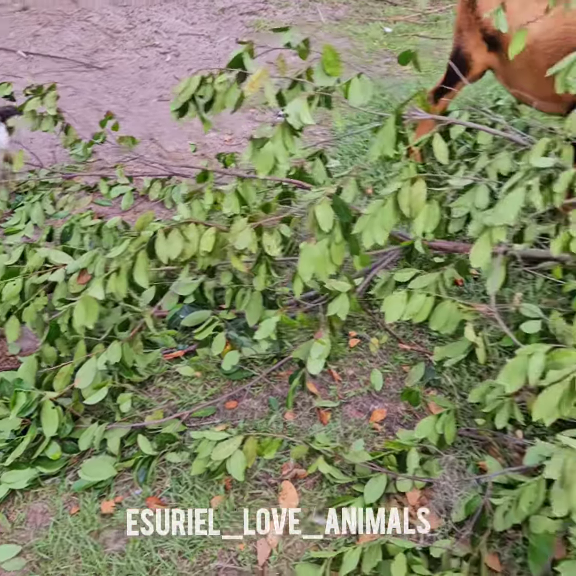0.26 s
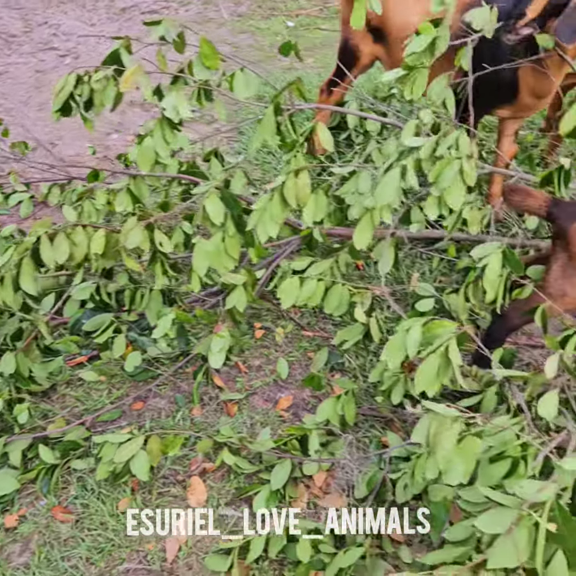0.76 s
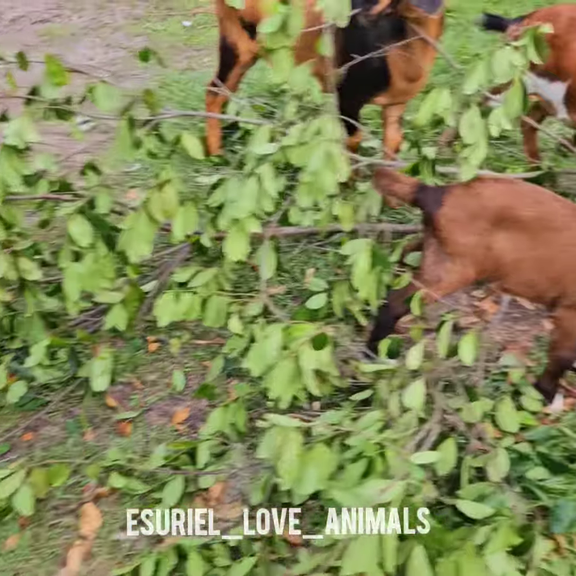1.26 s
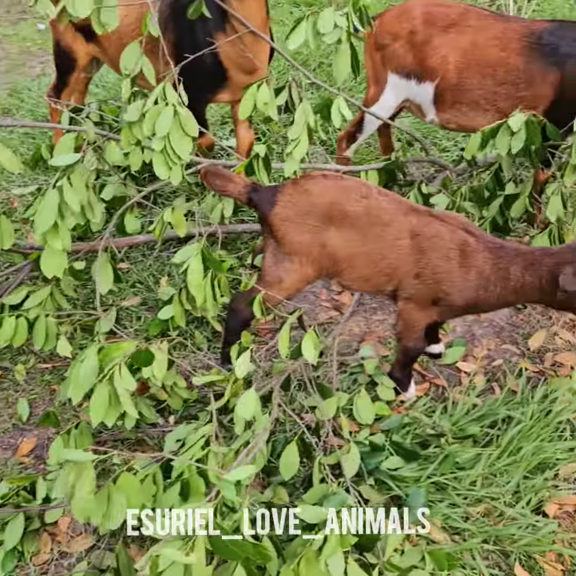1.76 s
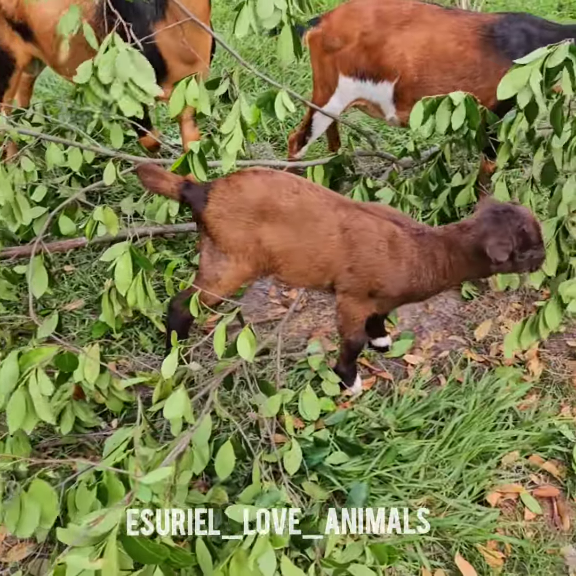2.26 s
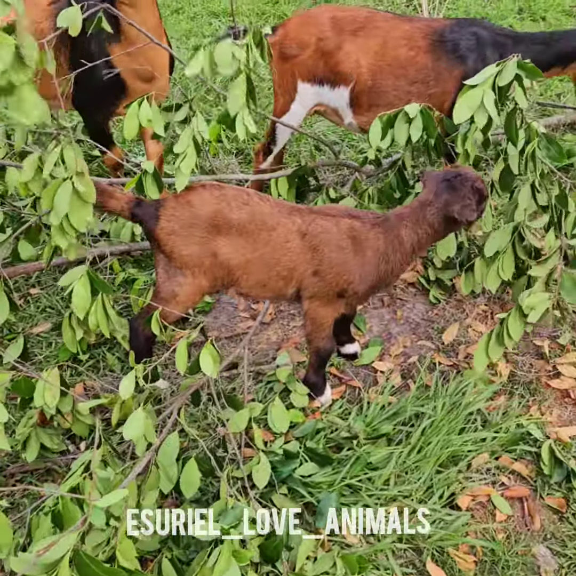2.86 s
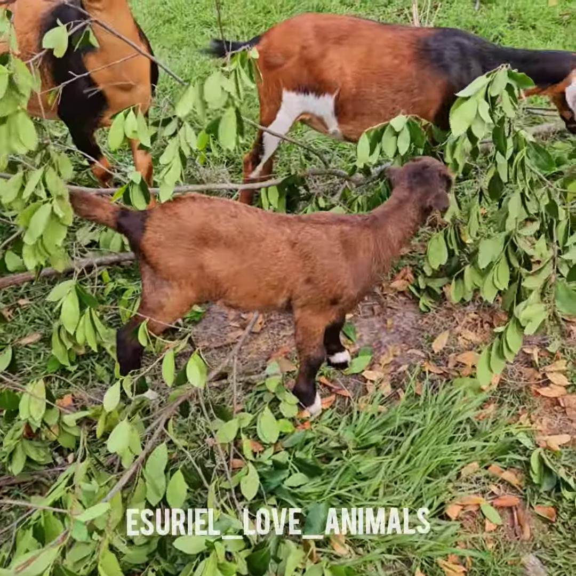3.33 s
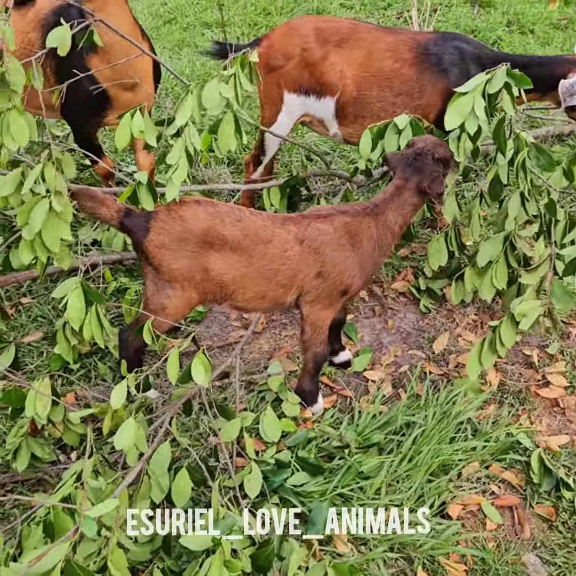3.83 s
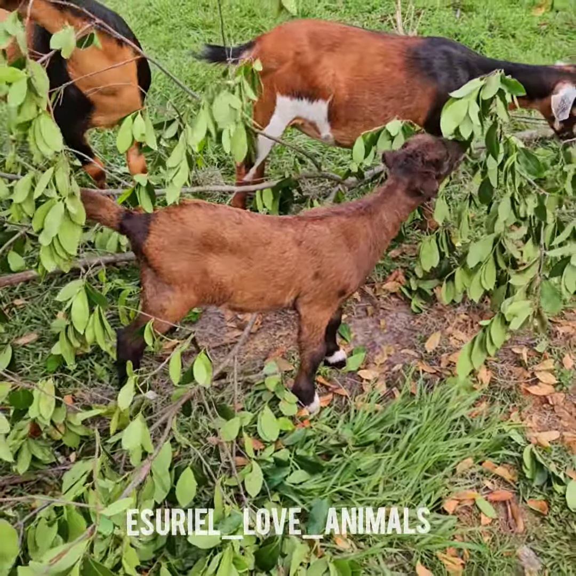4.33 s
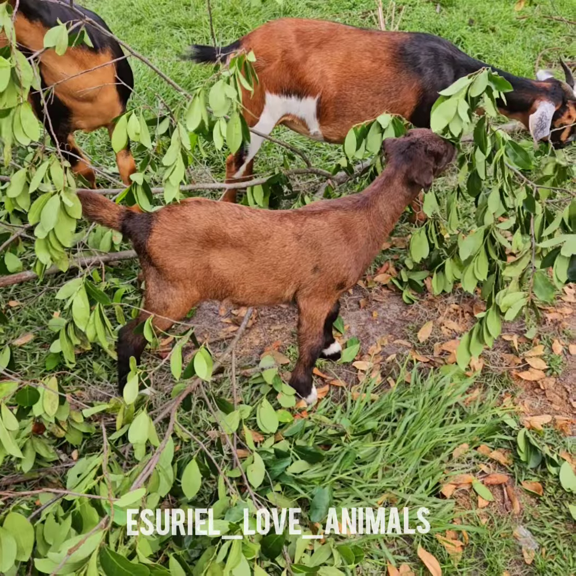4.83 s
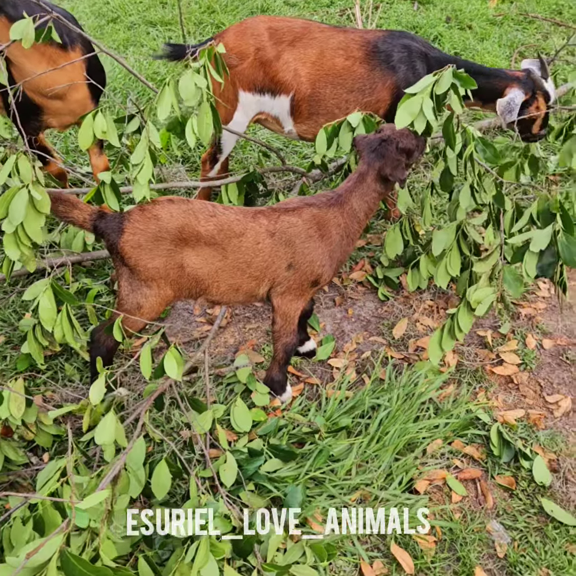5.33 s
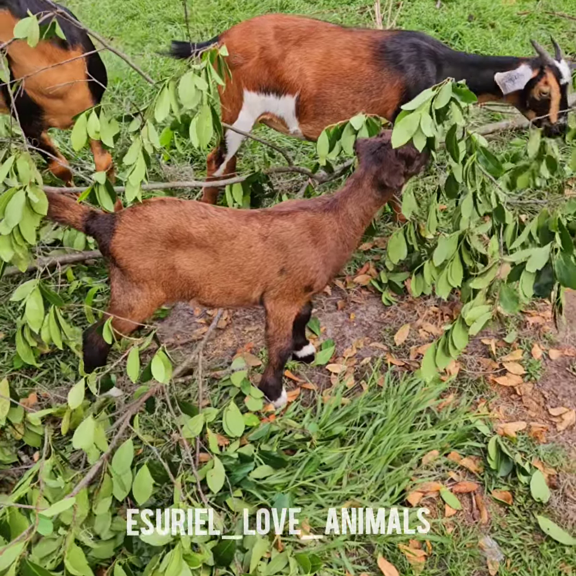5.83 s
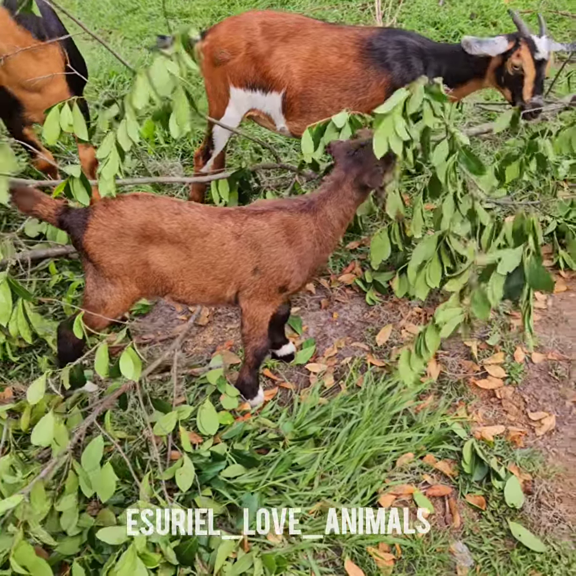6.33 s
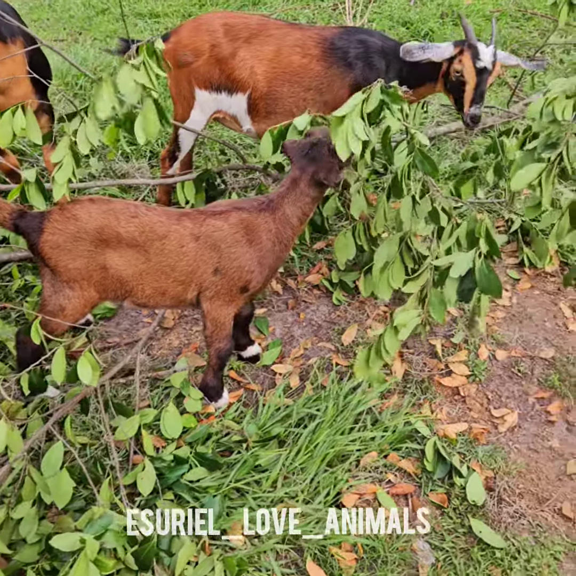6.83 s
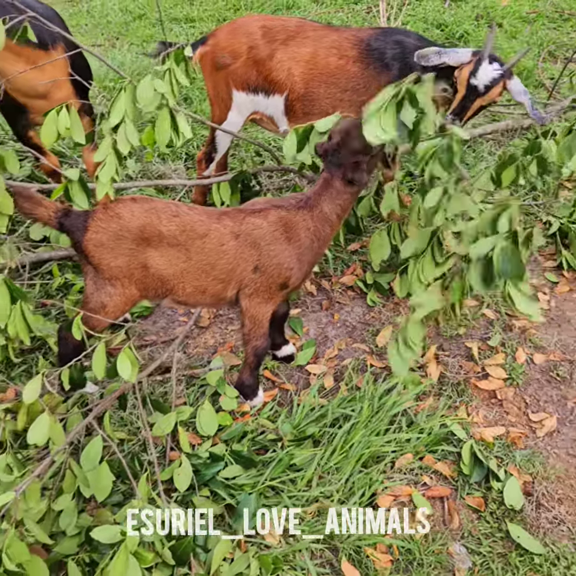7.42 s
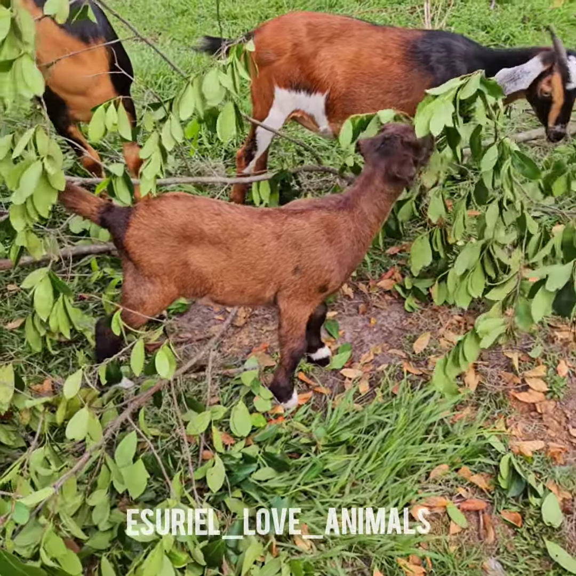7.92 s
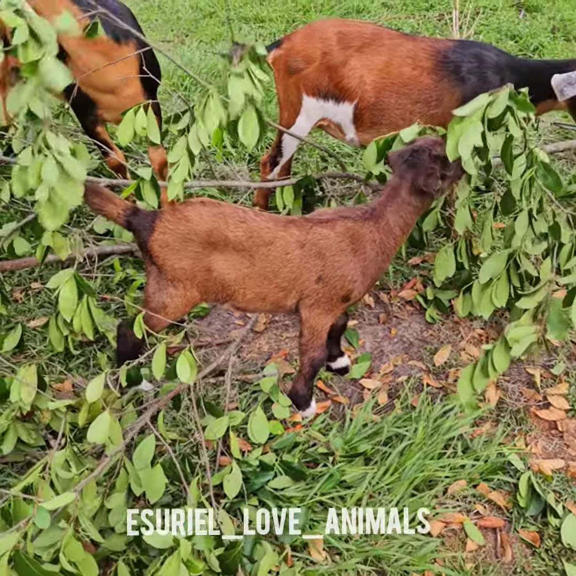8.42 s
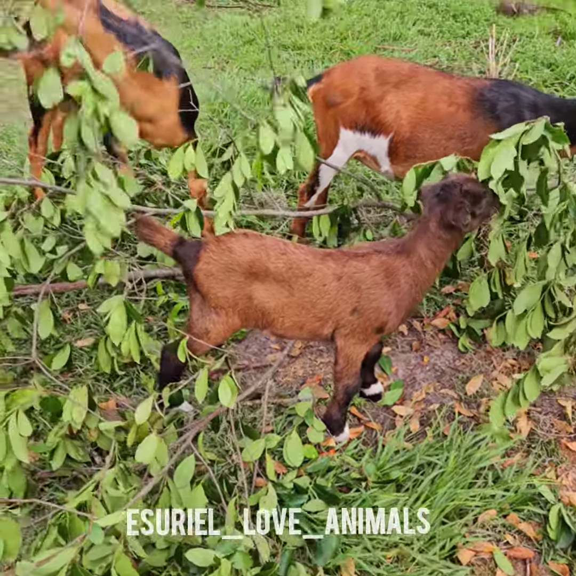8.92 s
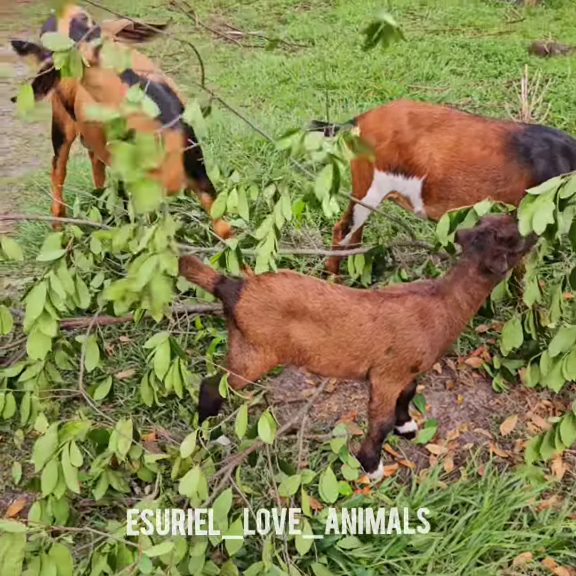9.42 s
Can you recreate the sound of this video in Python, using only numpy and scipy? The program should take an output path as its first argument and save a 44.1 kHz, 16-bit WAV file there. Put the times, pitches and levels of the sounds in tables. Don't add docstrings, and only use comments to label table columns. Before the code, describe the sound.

Goats browse a leafy branch in a farmyard: a hollow knock, twig snaps, one quick three-part kid bleat, a low moo-like answer, cicadas and distant engine drone.

```python
import sys
import numpy as np
from scipy import signal
from scipy.fft import rfft, irfft
from scipy.io import wavfile
from scipy.ndimage import uniform_filter1d

SR = 44100
rng = np.random.default_rng(int(sys.argv[2]) if len(sys.argv) > 2 else 0)


def file_out(sig):
    cols = np.atleast_2d(sig).T
    lim = np.clip(cols, -1, 1)
    pcm = np.round(lim * 32767).astype(np.int16)
    wavfile.write(sys.argv[1], SR, pcm)


def volts(x):
    e = np.asarray(x, float) / 20
    return 10 ** e


N = 426577


def evened(x):
    return x / np.sqrt(np.mean(x ** 2) + 1e-20)


def read(points, hz):
    f, value = np.transpose(points)
    return np.interp(np.log(hz + 1), np.log(f + 1), value)


def curves(rows, whole=False):
    s, *columns = np.transpose(rows)
    t = np.arange(N) / SR if whole else np.arange(s[0], s[-1], 1 / SR)
    return t, *(np.interp(t, s, c) for c in columns)


def add(mix, s, sound, pan_db=0., lag=0):
    for side, late, db in ((0, max(lag, 0), pan_db / 2), (1, max(-lag, 0), -pan_db / 2)):
        part = mix[side, round(s * SR) + late:][:len(sound)]
        part += volts(db) * sound[:len(part)]


def drift(hz, size=N):
    r = np.exp(-2 * np.pi * hz / SR)
    return evened(signal.lfilter([1], [1, -2 * r, r * r], rng.standard_normal(size)))


def resonate(x, hz, width):
    turn = np.exp(2j * np.pi * np.cumsum(hz * np.ones(len(x))) / SR)
    r = np.exp(-np.pi * width / SR)
    smooth = signal.lfilter([(1 - r) ** 2], [1, -2 * r, r * r], x / turn + 1e-18)
    return 2 * (turn * smooth).real


def through(x, modes, factor=0.99):
    return sum((-1) ** k * volts(db) * resonate(x, hz * factor, width)
               for k, (hz, width, db) in enumerate(modes))


# freq_hz, likeness
SAME = [(60, 0.98), (120, 0.97), (240, 0.9), (480, 0.66), (950, 0.28), (1700, -0.15), (3400, -.05),
        (5000, 0.4), (7000, 0.03), (15000, -0.01)]
# freq_hz, level_db (per Hz)
RUMBLE = [(13, -19), (22, -32), (33, -0.5), (59, -4), (75, -2), (88, -3), (98, 0), (114, -5), (179, -8),
          (211, -13.5), (230, -15.5), (268, -21.5), (332, -38), (450, -32.5), (580, -93), (990, -120)]


def rumble(level_db):
    hz = np.fft.rfftfreq(N, 1 / SR)
    a, b = rfft(rng.standard_normal((N, 2)).T)
    same = np.clip(read(SAME, hz), -1, 1)
    right = same * a + np.sqrt(1 - same ** 2) * b
    z = np.array([a * volts(.5), right]) * volts(read(RUMBLE, hz))
    return evened(irfft(z, N)) * volts(level_db + 1.0)


# freq_hz, left_right_db
LEAN = [(60, .6), (300, .5), (600, 1.5), (1300, 0), (2400, -.5), (3500, -2.5), (5000, -4.5), (7000, -1.5),
        (8500, 2), (10500, 3), (15000, -.5)]


def wash(spectrum, level_db, patchy_db, swell_db):
    frames, hz = N // 256 + 5, np.fft.rfftfreq(1024, 1 / SR)
    a, b, c, d, patches = rng.standard_normal((frames, 513, 5)).T
    patches = uniform_filter1d(patches, size=12, axis=0)
    patches = evened(uniform_filter1d(patches, size=14, axis=1))
    same = np.clip(read(SAME, hz), -1, 1)[:, None]
    lean = volts(read(LEAN, hz) / 2)[:, None]
    left = a + 1j * b
    right = same * left + np.sqrt(1 - same ** 2) * (c + 1j * d)
    z = np.array([left * lean, right / lean])
    z *= volts(read(spectrum, hz)[:, None] + patchy_db * patches)
    noise = evened(signal.istft(z, nperseg=1024, noverlap=768)[1][:, :N])
    return noise * volts(level_db + swell_db * drift(4.3))


# freq_hz, level_db (per Hz)
AIR = [(180, -21), (300, -3), (393, -8.5), (550, -1.5), (779, -1), (1460, -4), (2510, -19), (3260, -22.5),
       (4000, -20.5), (5200, -44), (8800, -120)]
# freq_hz, level_db (per Hz)
SWARM = [(3400, -35), (4200, -10), (4750, -0.5), (5150, -4), (5550, -15), (6100, -10), (7000, -13),
         (7350, 1), (8300, -4), (10400, -6.5), (11200, -14.5), (14800, -11.5), (15650, -16), (15800, -51)]


def air_and_swarm(far_db):
    air = wash(AIR, -56.5 + far_db, 0.53, 0.63)
    return air + wash(SWARM, -56 + 0.16 * far_db, 1.4, 0.26)


# time_s, firing_hz
ENGINE_SPEED = [
    (0.0, 78.5),
    (1.6, 81.5),
    (3.1, 85.2),
    (5.0, 88.16),
    (6.5, 87.1),
    (6.8, 71.95),
    (7.4, 62),
]
# start_s, length_s, level_db
SWELLS = [(0.446, 0.62, -40.5), (1.2, 0.49, -38.5), (1.742, 0.34, -43), (2.2, 0.26, -42.5),
          (2.498, 0.27, -38), (3.048, 0.74, -41.5), (3.656, 0.34, -46), (4.148, .55, -41.5),
          (4.89, 0.46, -38.5), (5.445, 0.34, -44), (6.15, 0.27, -43), (6.5, 0.42, -41), (7.0, .4, -49)]


def engine():
    t, hz = curves(ENGINE_SPEED)
    level = np.full((2, len(t)), volts(-64.5))
    for s, length, db in SWELLS:
        add(level, s, volts(db) * signal.windows.tukey(round(length * SR), 0.29))
    turn = 2 * np.pi * np.cumsum(hz * (1 + 0.01028 * drift(3.67, len(t)))) / SR
    tone = np.sin(turn) + volts(-15.0) * np.sin(2 * turn)
    tone = level[0] * tone * signal.windows.tukey(len(t), .05)
    return np.pad(tone, (0, N - len(t)))


# freq_hz, half_width_hz, level_db
OCTAVE_RING = (9500, 900, -16)


def tymbal(hz, db, drum_hz, width):
    turn = 2 * np.pi * np.cumsum(hz * (1 + .002 * drift(15.))) / SR
    ring_hz, ring_width, ring_db = OCTAVE_RING
    sound = 0
    for k in range(int(4200 / hz[0]), int(11000 / hz[0])):
        near = volts(-6 * ((k * hz - drum_hz) / width) ** 2)
        near = near + volts(ring_db - 6 * ((k * hz - ring_hz) / ring_width) ** 2)
        sound = sound + near * np.cos(k * turn + k % 2 * np.pi / 2)
    return volts(db + 2 * drift(6.)) * evened(sound)


PHRASES = [0.0, .55, 1.02, 1.48, 1.98, 2.45, 2.87, 3.28, 3.75, 4.13, 4.58, 4.95, 5.28, 5.58, 5.88, 6.16,
           6.42, 6.78, 7.1, 7.42, 7.8, 8.15, 8.6]
# time_s, level_db, click_hz (at a phrase start), sag_hz, drum_hz
SINGER = [(0.0, -72, 167.8, 2.8, 5150), (1.0, -66, 168.4, 3.4, 5150), (3.6, -62, 168.8, 3.8, 5150),
          (4.2, -61, 169, 3.8, 4960), (4.95, -61, 168.3, 1.8, 5010), (6.8, -61, 169.2, 1.6, 5020),
          (7.1, -61, 168, .8, 5020), (7.45, -62, 165.6, 2.1, 5120), (7.8, -65, 164, 1.5, 5120),
          (8.6, -82, 163, 1, 5120)]
# time_s, click_hz, level_db
CHORUS = [
    [(0.0, 283, -70), (2.0, 291.8, -68), (4.0, 297, -66), (4.6, 299, -68), (5.0, 299, -85)],
    [(0.0, 165, -69), (3.2, 165.3, -68), (3.8, 165.3, -85), (7.8, 160, -85), (8.4, 160, -72),
     (9.67, 159, -72)],
]


def cicadas():
    t, db, fast_hz, sag_hz, drum_hz = curves(SINGER, True)
    width = 118 + .9 * (5150 - drum_hz)
    starts, out = np.array(PHRASES), np.zeros((2, N))
    age = t - starts[np.searchsorted(starts, t, "right") - 1]
    rate = fast_hz - sag_hz * (1 - np.exp(-age / .14))
    strength_db = db - 5 * sag_hz * np.maximum(age - .15, 0)
    rate, strength_db = (uniform_filter1d(curve, size=1500) for curve in (rate, strength_db))
    add(out, 0, tymbal(rate, strength_db, drum_hz, width), -6, lag=-8)
    for rows in CHORUS:
        _, click_hz, level_db = curves(rows, True)
        add(out, 0, tymbal(click_hz, level_db, 4900, 380), -5, lag=-8)
    return out


# middle_s, level_db, half_length_s
TUGS = [
    (0.0, -68, 0.1),
    (1.496, -64, 0.57),
    (2.473, -66, .08),
    (5.23, -65.5, 0.043),
    (6.0, -73, 0.064),
    (6.222, -66, 0.041),
    (6.972, -73, .12),
    (7.405, -63, 0.13),
    (8.503, -74.5, 0.33),
    (9.215, -67.5, 0.37),
]


def leaves():
    clock, out, t = np.arange(N) / SR, np.zeros((2, N)), np.arange(200) / SR
    pull = volts(-79)
    pull = pull + sum(volts(db) * np.exp(-((clock - s) / half) ** 2) for s, db, half in TUGS)
    for k, hz in enumerate(np.geomspace(1500, 9000, num=16)):
        struck = rng.random(N) < 60. / SR
        size = volts(2.34 * np.minimum(rng.exponential(1, N), 5)) * struck
        tick = np.sin(2 * np.pi * hz * t) * np.exp(-t * hz / 3.0)
        out[k % 2] += signal.oaconvolve(size, tick / np.linalg.norm(tick))[:N]
    return volts(3.0) * pull * evened(out)


# start_s, peak_db, pitch_hz, t60_s
KNOCKS = [
    (0.0242, -19.5, 471, 0.05),
    (1.17, -39.5, 279, 0.13),
    (1.534, -31, 558, 0.036),
    (3.376, -34.5, 324, 0.068),
    (5.192, -41, 310, 0.1),
    (7.39, -31.5, 367, 0.087),
    (8.901, -35, 346, 0.11),
]


def knocks(mix):
    t = np.arange(9000) / SR
    for s, db, hz, t60 in KNOCKS:
        modes = np.sin(2 * np.pi * hz * t) + .5 * np.sin(2 * np.pi * 1.13 * hz * t)
        modes += 0.31 * np.sin(2 * np.pi * 0.777 * hz * t)
        add(mix, s, volts(db - 60 * t / t60) * modes * (1 - np.exp(-t / 0.0054)), .4)


def snap(db, hz, width):
    t = np.arange(1500) / SR
    decay = np.exp(-t / .0012) + .15 * np.exp(-t / .006)
    burst = rng.standard_normal(len(t)) * decay * (1 - np.exp(-t / .0004))
    burst[30] += 3
    sound = resonate(burst, hz, width * hz)
    return volts(db) * sound / abs(sound).max()


# start_s, peak_db, colour_hz, left_right_db
SNAPS = [(0.05, -38.5, 2070, -2), (0.6862, -33, 6150, -10), (1.846, -42, 900, 0), (1.874, -40.5, 2200, -4),
         (1.881, -37, 2000, 3), (1.889, -39, 780, 0), (2.38, -41, 6500, 5), (3.02, -38, 10000, -2),
         (4.14, -36, 10820, 0), (5.657, -38.5, 4487, -2), (6.178, -31, 8700, 17), (6.2193, -35.5, 1610, -2),
         (6.2187, -37, 7010, -13), (6.229, -37.5, 1100, 0), (6.8013, -37, 4660, -9),
         (7.342, -44, 4100, -11), (7.3995, -38, 4700, -11.5), (7.81, -42, 11300, 0),
         (8.7276, -43.5, 1170, 3), (8.9558, -30.5, 8800, -11), (9.175, -27.5, 7050, -5.5),
         (9.175, -49, 1500, -11), (9.196, -37, 6000, -8), (9.2638, -39, 6200, -13), (9.291, -37, 1000, 0)]


def twigs(mix):
    for s, db, hz, pan_db in SNAPS:
        width = 0.56 + 0.15 * np.log2(hz / 1000)
        add(mix, s, snap(db, hz, width), pan_db, lag=3)


# start_s, peak_db, colour_hz
PLUCKS = [(.43, -45, 4000), (1.857, -48, 2200), (1.866, -43, 2400), (5.22, -48, 2994), (5.775, -50, 2483),
          (5.975, -45, 4980), (6.02, -47, 3460), (6.921, -49, 3500), (6.961, -45, 3800), (7.017, -48, 3510),
          (7.384, -47, 3500), (7.477, -46, 3000), (8.728, -44, 3540), (9.25, -44, 7000), (9.287, -43, 1790),
          (9.356, -48, 3000), (9.571, -47, 2440)]


def stalks(mix):
    for s, db, hz in PLUCKS:
        add(mix, s, snap(db, hz, .8), -7, lag=3)


# freq_hz, width_hz, level_db
KID_THROAT = [(660, 410, -4.5), (1460, 134, 2.5), (2460, 260, -21), (2860, 660, 3.5), (3440, 540, -1),
              (3900, 620, -1), (4700, 1800, -12)]
# start_s, length_s, effort_db, pitch_hz, brightness_db
SYLLABLES = [
    (1.268, .085, -46, 347, -3),
    (1.362, .112, -36.5, 351.5, -2.5),
    (1.486, .112, -40, 340, -2),
]


def bleat(start, length, peak_db, pitch_hz, top_db):
    t = np.arange(0, length, 1 / SR)
    peak_at = 0.17
    rise = np.maximum(1 - t / length / peak_at, 0)
    fall = np.maximum(t / length - peak_at, 0) / (1 - peak_at)
    effort_db = peak_db - 16 * rise - 26 * fall ** 3.1
    bright_db = top_db + 15 * rise - 8 * fall
    hz = pitch_hz * (1 - .02 * (fall + rise))
    mouth = .97 + (.9 - .97) * fall + .4 * (start - SYLLABLES[1][0])
    turns = np.cumsum(hz * (1 + .007 * drift(60., len(t)))) / SR
    folds = sum(volts(.2 * k * drift(40., len(t))) * np.cos(2 * np.pi * k * turns)
                for k in range(1, 18))
    puffs = (0.27 + np.exp(-(turns % 1) / .3)) * rng.standard_normal(len(t))
    rough = .44 - .006 * (peak_db + 41)
    drive = (1 - rough) * evened(folds) + rough * evened(puffs)
    drive = drive * volts(2.0 * drift(40., len(t)))
    low, high = through(drive, KID_THROAT[:2], mouth), through(drive, KID_THROAT[2:], mouth)
    voice = volts(-8.5) * evened(low) + volts(bright_db) * evened(high)
    return start, volts(effort_db) * voice * signal.windows.tukey(len(t), .15)


# time_s, pitch_hz, effort_db, lips_parting_db
MOO = [(3.66, 143.7, -60, -26), (3.74, 152.9, -38, -17), (3.8, 171, -55, -19), (3.856, 178.5, -32.5, -8),
       (3.99, 198.7, -41.5, -8), (4.07, 210.8, -33, -4.5), (4.3, 211.3, -31, -0.5),
       (4.53, 190, -44.5, -16.5), (4.58, 172, -50, -22)]
# freq_hz, width_hz, level_db
NOSE = [(390, 90, -6.5), (630, 160, -8.5), (840, 130, 0), (1000, 170, -3)]
# freq_hz, width_hz, level_db
LIPS = [(2250, 600, 0), (3000, 600, -4), (3680, 320, 2.5)]


def moo():
    t, hz, chest_db, parting_db = curves(MOO)
    nose_db = -49 + 0.078 * (chest_db + 27)
    nose_db = nose_db + 1.6 * np.minimum(parting_db + 14, 0)
    lips_db = -58.5 + parting_db
    turn = 2 * np.pi * np.cumsum(hz * (1 + .007 * drift(14., len(t)))) / SR
    pulses = sum(volts(.2 * k * drift(20., len(t))) * np.cos(k * turn)
                 for k in range(2, 22))
    breathy = pulses + 1.5 * rng.standard_normal(len(t))
    voice = volts(chest_db + 3.0) * np.sin(turn)
    voice = voice + volts(nose_db - 2) * evened(through(pulses, NOSE))
    voice = voice + volts(lips_db) * evened(through(breathy, LIPS))
    return t[0], voice * signal.windows.tukey(len(t), .06)


def yard(x):
    taps = np.zeros((2, SR // 2))
    at = np.arange(300, SR // 2 - 20, 20) + rng.integers(0, 20, (2, (SR // 2 - 301) // 20))
    np.put_along_axis(taps, at, rng.choice([-1., 1.], at.shape), 1)
    taps *= volts(-60 * np.arange(SR // 2) / SR / 0.2)
    return signal.fftconvolve(x, taps / np.linalg.norm(taps[0]), axes=1)[:, :N]


# time_s, level_db
FAR = [(0.0, 5), (.6, 2), (1.35, 4), (2.2, 0.5), (3.7, 3.5), (4.2, 4.5), (4.6, 2.5), (7.0, 0), (9.67, 1)]


def scene():
    kid, near, far_db = np.zeros((2, N)), np.zeros((2, N)), curves(FAR, True)[1]
    knocks(near)
    twigs(near)
    stalks(near)
    for syllable in SYLLABLES:
        add(kid, *bleat(*syllable), 1.5, lag=-5)
    add(near, *moo(), .5, lag=-1)
    animals = kid + volts(-3) * yard(kid) + near + volts(-19) * yard(near)
    far = rumble(-42.5 + 0.39 * far_db) + air_and_swarm(far_db) + engine()
    return animals + leaves() + cicadas() + far


def roll_off(x):
    return signal.sosfilt(signal.butter(12, 16450, fs=SR, output="sos"), x)


def record(dry):
    low_cut = signal.butter(3, 43, "high", fs=SR, output="sos")
    cut = signal.sosfilt(low_cut, dry)
    limited = signal.oaconvolve(cut, signal.firwin(255, 16300, fs=SR)[None], "same")
    return roll_off(limited)


dry = scene()
out = record(dry)
file_out(out)
```